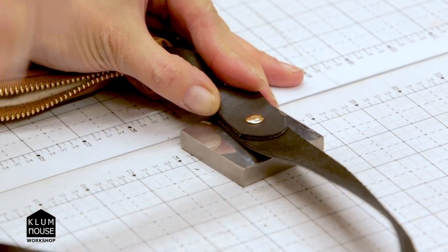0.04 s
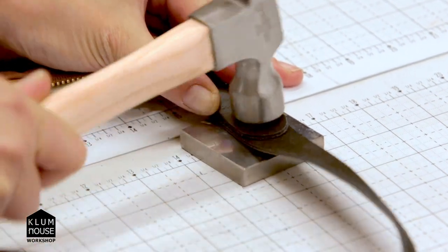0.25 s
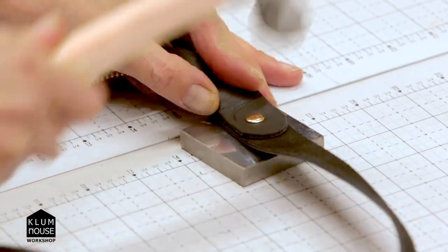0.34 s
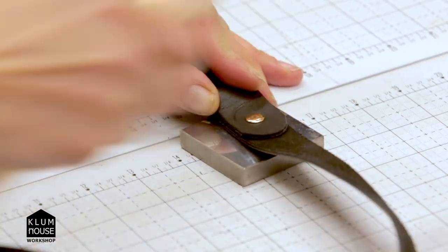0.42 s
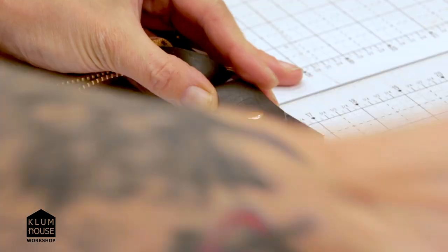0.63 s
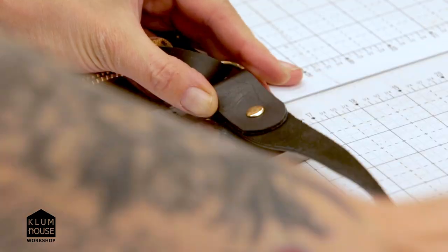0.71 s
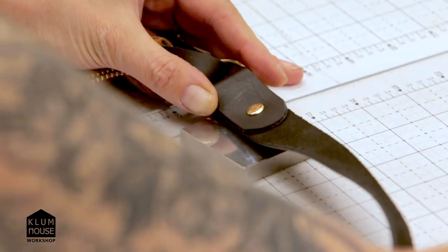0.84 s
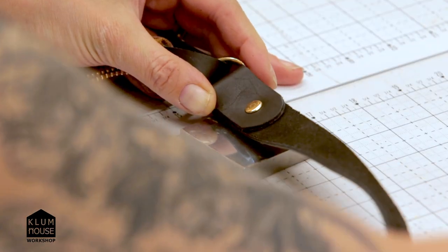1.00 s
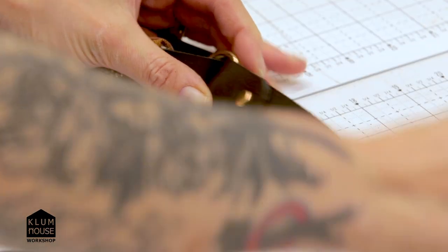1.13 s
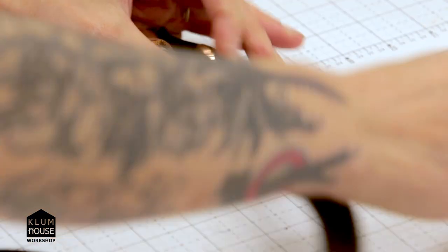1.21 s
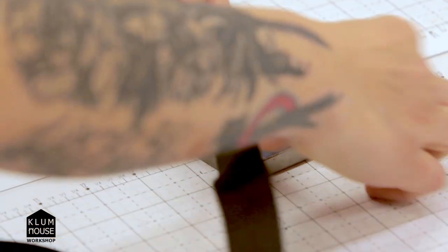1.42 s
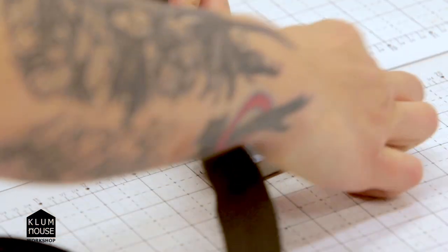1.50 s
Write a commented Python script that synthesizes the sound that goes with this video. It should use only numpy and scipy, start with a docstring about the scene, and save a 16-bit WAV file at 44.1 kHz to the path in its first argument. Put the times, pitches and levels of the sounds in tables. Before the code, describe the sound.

A single hard hammer blow on a rivet over a steel block, two light rebound ticks, then three dull knocks as the hammer is put down, and faint leather sliding; small workshop, close overloaded microphone, mono.

```python
"""Riveting on a small anvil

One hard hammer blow, while the previous one dies away: filtered noise for crack and clatter, decaying modes
for the bench thump and the faint ring of the steel. Two light contacts follow as the hammer rebounds.
Three knocks, low-passed noise and modes, lay the hammer down; coloured noise is the leather strap sliding
over the cutting mat, with a thin whistle of modulated sine. Room tone lies beneath; the microphone overloads.
"""
import sys
import numpy as np
from scipy import signal
from scipy.fft import rfft, irfft, next_fast_len
from scipy.io import wavfile
from scipy.ndimage import uniform_filter1d

SR = 44100
rng = np.random.default_rng(int(sys.argv[2]) if len(sys.argv) > 2 else 0)


def to_wav(sig):
    """Store sig (one row per channel, or 1-D mono) as 16-bit WAV at the path in sys.argv[1].

    Samples outside -1..1 are clipped; the rate is SR.
    """
    pcm = np.clip(np.atleast_2d(sig), -1, 1) * 32767
    pcm = np.round(pcm).astype(np.int16)
    wavfile.write(sys.argv[1], SR, pcm.T)  # frames by channels


N = 68355  # length in samples

# Levels are relative gains; T60 is the time taken to fall by 60 dB.
# Workshop reverberation: f/Hz, T60/s
ROOM_T60 = [(100, .46), (400, 0.58), (1500, 0.64), (4000, 0.47), (8000, .44), (15000, .3)]
# First reflection from a nearby surface, relative to the contact pulse
ECHO_S, ECHO_DB = .0046, -4.5
# Width over which the spectrum of an impact is levelled
EVEN_WIDTH_HZ = 70

# Spectrum of the room tone: f/Hz, relative level/dB
FLOOR_COLOUR = [(20, -1), (60, 0.5), (110, -6.5), (200, -8), (290, -21), (700, -23.5), (1200, -23),
                (2200, -41), (5000, -45), (11000, -48.5), (15500, -59)]
FLOOR_DB = -59.5

# Strap and hand sliding on the mat: t/s, level/dB
SLIDE_LEVEL = [(.8, -93.5), (1.15, -77), (1.33, -65.5), (1.42, -65), (1.48, -60.5), (1.55, -59.5)]
# Spectrum of the sliding friction: f/Hz, relative level/dB
SLIDE_COLOUR = [(50, 4.5), (110, 0), (220, -2), (400, -5.5), (800, -5.5), (1500, -17.5), (3000, -26),
                (6000, -26.5), (10000, -33.5), (15500, -26)]
# Thin whistle of the fine-grained mat: t/s, f/Hz, level/dB
WHISTLE = [(1.36, 11400, -93), (1.41, 13600, -81), (1.445, 14300, -76), (1.48, 15300, -81),
           (1.55, 15500, -79)]
WHISTLE_CUTOFF_HZ = 150  # the whistle spreads this far to either side of its centre
STRAP_TICK_S, STRAP_TICK_DB, STRAP_TICK_T60_S = 1.347, -44, .03

# Hammer laid on the bench: t/s, level/dB, contact cut-off f/Hz, then click, bench ring and ping,
# each as level/dB relative to the knock
KNOCKS = [(0.8871, 2, 880, -32.5, -42.5, -48.5), (0.9807, 8.5, 1296, -34, -46.5, -60),
          (1.074, 7.5, 1150, -20.5, -45.5, -35)]
# Spectrum of the dull thud of a knock: f/Hz, relative level/dB
KNOCK_COLOUR = [(30, -44), (80, -14), (130, -35.5), (220, 1.5), (400, 2), (650, -3), (1100, -1), (1500, -7),
                (1900, -8), (2450, -2.5), (3100, -16), (6000, -14.5), (15000, -2)]
KNOCK_PULSE_DB, KNOCK_BUILD_S, KNOCK_HOLD_S, KNOCK_T60_S, KNOCK_ROOM_DB = -3.5, .00082, .0023, .1, -18
# Spectrum of the bright click of a knock: f/Hz, relative level/dB
CLICK_COLOUR = [(500, 21.5), (1050, 9.5), (1450, 20), (1850, -5.5), (2500, 1.5), (3100, -12), (3700, -4.5),
                (5500, -11), (8000, -20), (12000, -38), (16000, -44)]
CLICK_PULSE_DB, CLICK_BUILD_S, CLICK_T60_S, CLICK_ROOM_DB = -9, .0024, .077, -19.5
# Modes of the bench where the hammer is laid: f/Hz, relative level/dB, T60/s
BENCH_SIDE_MODES = [(123, -8, .3), (156, -1, .38), (185, -8, .25), (275, -9, .3), (318, -3, .22),
                    (345, -4, .24), (412, -5, .24), (480, -6, .2), (620, -4, .2), (662, 1, .16),
                    (868, -2, .16), (1070, -4, .17)]
# Short ping of the hammer as it touches down: f/Hz, relative level/dB, T60/s
PING_MODES = [(2510, 1.5, 0.0067), (3530, -17.5, 0.012)]
PING_BUILD_S = .00069

# Light steel contacts as the hammer rebounds: t/s, level/dB
TICKS = [(0.2765, -7.5), (0.3137, -14.5)]
# Spectrum of a light contact: f/Hz, relative level/dB
TICK_COLOUR = [(300, -27), (1500, 16.5), (3500, 1), (7000, -14), (9000, -38), (15000, -30)]
TICK_PULSE_DB, TICK_BUILD_S, TICK_T60_S, TICK_ROOM_DB = -9, .0005, .14, -11
# Modes of the hammer head: f/Hz, relative level/dB, T60/s
HEAD_MODES = [(7072, -10, .22), (10195, -3, .18), (10435, 0, .19)]
HEAD_DB, HEAD_BUILD_S = -45.5, .0066

# Hard blows, the first before the start: t/s, level/dB
BLOWS = [(-.29, 4), (0.2146, 0)]
# Spectrum of the clatter of a blow: f/Hz, relative level/dB
BLOW_COLOUR = [(25, -15), (70, -2), (130, -4), (280, -0.5), (390, -4), (620, -3.5), (1000, -6.5),
               (1280, -9), (1800, -12.5), (2150, -19.5), (2800, -26.5), (3400, -36), (5500, -44),
               (7500, -43), (10000, -50), (15500, -49)]
BLOW_DB, BLOW_PULSE_DB, BLOW_ROOM_DB = 36.5, -20.5, -14
BLOW_BUILD_S, BLOW_HOLD_S, BLOW_T60_S = .0015, .012, .15
# Spectrum of the rivet crushing under the hammer face: f/Hz, relative level/dB
CRACK_COLOUR = [(200, -3.5), (700, -4.5), (1800, 1), (2700, -7.5), (3300, -17.5), (3900, -5.5),
                (4600, -25.5), (8000, -30.5), (15000, -46)]
CRACK_DB, CRACK_DELAY_S, CRACK_T60_S = 17.5, .003, .02
# Deep, well damped modes of the bench top: f/Hz, relative level/dB, T60/s
THUMP_MODES = [(135, -9, .1), (218, -3, .1), (290, -4, .1), (625, -3, .07), (810, -6, .06)]
THUMP_DB, THUMP_DELAY_S, THUMP_BUILD_S = -12, .0012, .001
# Modes of the bench under the anvil: f/Hz, relative level/dB, T60/s
BENCH_MODES = [(122, -3, .3), (146, 0, .36), (212, -1, .27), (236, 0, .33), (298, 0, .33), (338, -1, .2),
               (435, -3, .3), (503, -3, .33), (618, 0, .24), (641, -1, .28), (788, -2, .3), (977, -2, .24),
               (1015, -3, .24), (1463, -6, .27), (1570, -3, .18)]
BENCH_DB, BENCH_BUILD_S = -21, .00046
# Modes of the anvil under a full blow: f/Hz, relative level/dB, T60/s
ANVIL_MODES = [(7072, -15, .33), (14252, 0, .26)]
ANVIL_DB, ANVIL_BUILD_S = -46, .03

OVERLOAD = .68  # amplitude near which the microphone saturates
TOP_HZ = 15800


def undb(db):
    """Level to amplitude: every 20 dB is a factor of ten."""
    return 10 ** (np.asarray(db) / 20)


def clock():
    """Time axis: the instant of every sample in seconds."""
    return np.arange(N) / SR


def on_log(hz, points):
    """Logarithmic frequency: interpolate a table of (f/Hz, value) along equal ratios."""
    f, value = np.array(points, float).T
    return np.interp(np.log(np.maximum(hz, 1)), np.log(f), value)


def colour(x, points):
    """Minimum-phase filtering: folding the cepstrum gives a causal filter of the tabled (f/Hz, dB)."""
    n = 2 * next_fast_len(N)
    hz = np.arange(n // 2 + 1) * SR / n
    cepstrum = irfft(np.log(undb(on_log(hz, points))))
    cepstrum[1:n // 2] *= 2
    cepstrum[n // 2 + 1:] = 0
    response = np.exp(rfft(cepstrum))
    return irfft(rfft(x, n) * response)[:N]


def lowpass(x, hz, order=2):
    """Butterworth low-pass: a smooth passband, then a steady fall above the cut-off."""
    sos = signal.butter(order, min(hz, SR / 2 - 1), fs=SR, output="sos")
    return signal.sosfilt(sos, x)


def noise(points):
    """Stationary random sound: white noise shaped to a spectrum, at rms 1."""
    x = colour(rng.standard_normal(N), points)
    return x / x.std()


def fade(t60, hold=0):
    """Exponential decay: after the hold, the level falls 60 dB in t60 seconds."""
    return np.exp(-np.log(1000) * np.maximum(clock() - hold, 0) / t60)


def swell(build):
    """Exponential build-up: amplitude approaches 1 with the time constant build in seconds."""
    return 1 - np.exp(-clock() / build)


def at(x, start):
    """Time shift: delay a sound to its start in seconds; a negative start cuts off its onset."""
    k = int(round(start * SR))
    padded = np.pad(x, (max(k, 0), max(-k, 0)))
    return padded[max(-k, 0):][:N]


def ring(modes, build):
    """Modal superposition: damped sines in random phases swell together, then die at their own rates."""
    t = clock()
    total = 0
    for (hz, db, t60), turn in zip(modes, rng.random(len(modes))):
        total = total + undb(db) * fade(t60) * np.sin(2 * np.pi * (hz * t + turn))
    return total * swell(build)


def burst(points, t60):
    """Transient contact noise: decaying white noise of unit energy, shaped to a spectrum."""
    x = rng.standard_normal(N) * fade(t60)
    return colour(x / np.linalg.norm(x), points)


def even(x):
    """Spectral whitening: dividing out the smoothed power removes broad chance humps; near unit energy."""
    power = uniform_filter1d(abs(rfft(x)) ** 2, int(EVEN_WIDTH_HZ * N / SR))
    hz = np.arange(1, len(power) + 1) * SR / N
    return colour(x, np.c_[hz, -10 * np.log10(power)])


def room_tail():
    """Frequency-dependent reverberation: overlapping octave bands of noise decay at their own T60."""
    hz = np.arange(N // 2 + 1) * SR / N
    octave = np.clip(np.log2(np.maximum(hz, 1) / 125), 0, 7)
    air = rfft(rng.standard_normal(N))
    tail = 0
    for k in range(8):
        band = irfft(air * np.maximum(1 - abs(octave - k), 0), N)
        tail = tail + band * fade(on_log(125 * 2 ** k, ROOM_T60))
    return tail * swell(.005)


def impact(pulse_db, build, hold, t60, room_db):
    """Impulsive excitation: a contact pulse and its echo, dense clatter and a room tail, then whitened."""
    envelope = fade(t60, hold) * swell(build)
    clatter = envelope * rng.standard_normal(N)
    diffuse = (clatter + undb(room_db) * room_tail()) / np.linalg.norm(envelope)
    pulse = undb(pulse_db) * (clock() == 0)
    return even(diffuse + pulse + undb(ECHO_DB) * at(pulse, ECHO_S))


def tick(start, db, t60):
    """Light impact: a small, bright contact and its trace in the room."""
    contact = impact(TICK_PULSE_DB, TICK_BUILD_S, 0, t60, TICK_ROOM_DB)
    return undb(db) * at(colour(contact, TICK_COLOUR), start)


def room_tone():
    """Ambient noise: the steady, quiet sound of the workshop."""
    return undb(FLOOR_DB) * noise(FLOOR_COLOUR)


def whistle():
    """Amplitude modulation: slow noise times a gliding sine makes a narrow band, the whistle of the mat."""
    t = clock()
    times, hz, db = np.array(WHISTLE).T
    grain = lowpass(rng.standard_normal(N), WHISTLE_CUTOFF_HZ)
    grain = np.sqrt(2) * grain / grain.std()
    carrier = np.sin(2 * np.pi * np.cumsum(np.interp(t, times, hz)) / SR)
    return grain * carrier * undb(np.interp(t, times, db)) * (t > times[0])


def slide():
    """Sliding friction: leather and skin brush the mat as shaped noise, with its whistle and one tick."""
    brush = noise(SLIDE_COLOUR) * undb(np.interp(clock(), *np.array(SLIDE_LEVEL).T))
    return brush + whistle() + tick(STRAP_TICK_S, STRAP_TICK_DB, STRAP_TICK_T60_S)


def knocks():
    """Contact stiffness: handle and head settle on the bench, each thud low-passed at its own cut-off."""
    out = 0
    for start, db, contact_hz, click_db, ring_db, ping_db in KNOCKS:
        thud = impact(KNOCK_PULSE_DB, KNOCK_BUILD_S, KNOCK_HOLD_S, KNOCK_T60_S, KNOCK_ROOM_DB)
        bench = undb(ring_db) * ring(BENCH_SIDE_MODES, BENCH_BUILD_S)
        body = lowpass(colour(thud, KNOCK_COLOUR) + bench, contact_hz, order=3)
        click = impact(CLICK_PULSE_DB, CLICK_BUILD_S, 0, CLICK_T60_S, CLICK_ROOM_DB)
        click = undb(click_db) * colour(click, CLICK_COLOUR)
        ping = undb(ping_db) * ring(PING_MODES, PING_BUILD_S)
        out = out + undb(db) * at(body + click + ping, start)
    return out


def rebound():
    """Repeated impact: the head chatters on the rivet and its modes ring thinly at each contact."""
    head = undb(HEAD_DB) * ring(HEAD_MODES, HEAD_BUILD_S)
    out = 0
    for start, db in TICKS:
        out = out + tick(start, db, TICK_T60_S) + undb(db) * at(head, start)
    return out


def blows():
    """Hard impact: the rivet crushes with a crack, the bench thumps and clatters, the anvil rings faintly."""
    out = 0
    for start, db in BLOWS:
        clatter = impact(BLOW_PULSE_DB, BLOW_BUILD_S, BLOW_HOLD_S, BLOW_T60_S, BLOW_ROOM_DB)
        clatter = undb(BLOW_DB) * colour(clatter, BLOW_COLOUR)
        crack = undb(CRACK_DB) * at(burst(CRACK_COLOUR, CRACK_T60_S), CRACK_DELAY_S)
        thump = undb(THUMP_DB) * at(ring(THUMP_MODES, THUMP_BUILD_S), THUMP_DELAY_S)
        bench = undb(BENCH_DB) * ring(BENCH_MODES, BENCH_BUILD_S)
        anvil = undb(ANVIL_DB) * ring(ANVIL_MODES, ANVIL_BUILD_S)
        out = out + undb(db) * at(clatter + crack + thump + bench + anvil, start)
    return out


def scene():
    """Linear superposition: the pressures of room tone and hammer work add, in one channel."""
    return (room_tone() + slide() + knocks() + rebound() + blows())[None]


def record(dry):
    """Saturation: the microphone flattens the loudest peaks; a steep elliptic low-pass cuts the top."""
    rounded = dry / (1 + (dry / OVERLOAD) ** 4) ** (1 / 4)
    sos = signal.ellip(10, .2, 80, TOP_HZ, fs=SR, output="sos")  # ripple/dB, stopband/dB
    return signal.sosfilt(sos, rounded)


dry = scene()
out = record(dry)
to_wav(out)
```